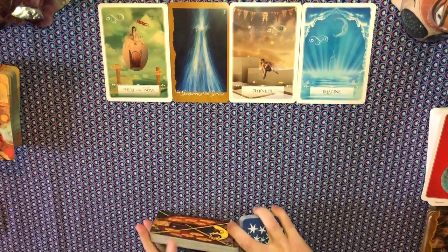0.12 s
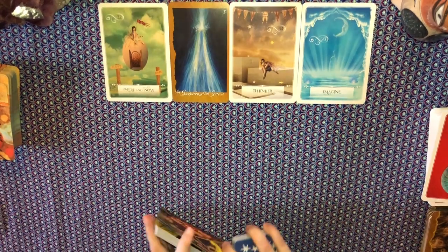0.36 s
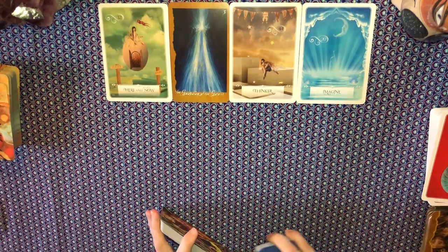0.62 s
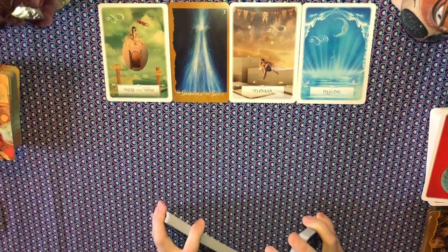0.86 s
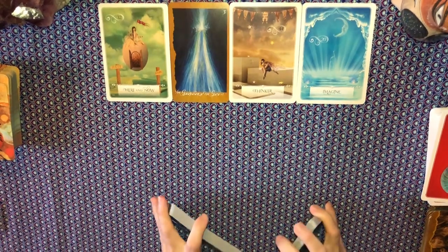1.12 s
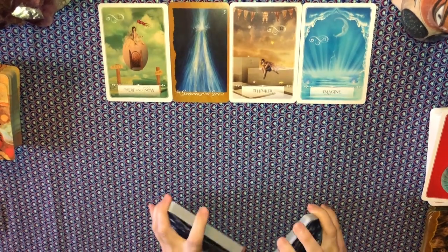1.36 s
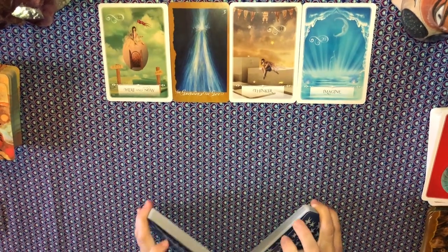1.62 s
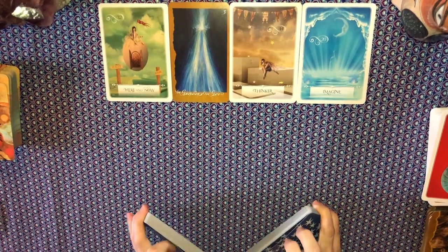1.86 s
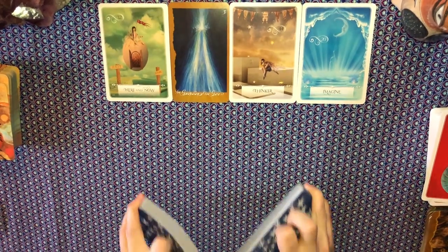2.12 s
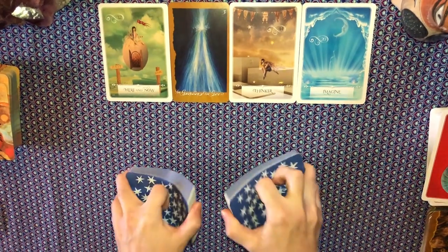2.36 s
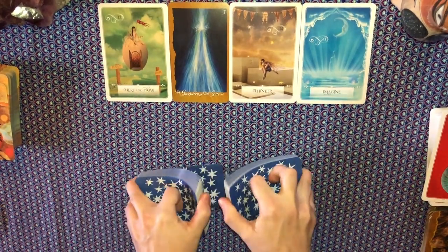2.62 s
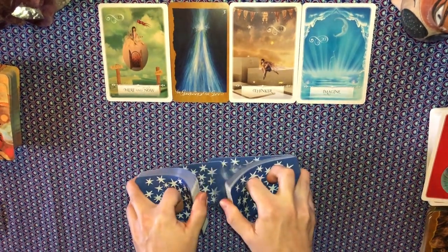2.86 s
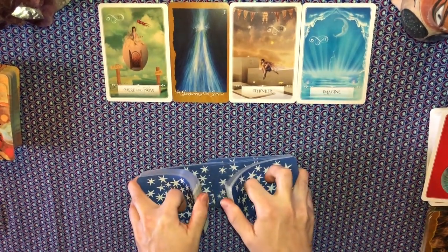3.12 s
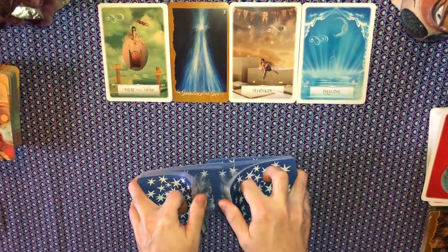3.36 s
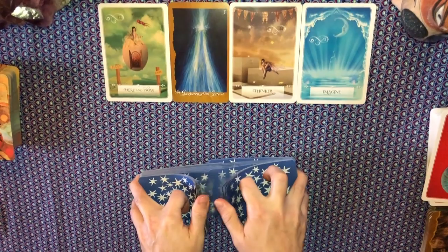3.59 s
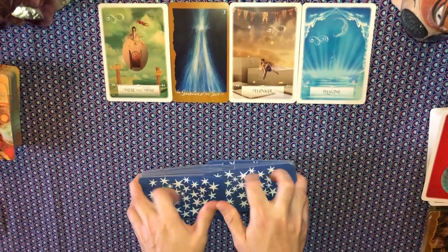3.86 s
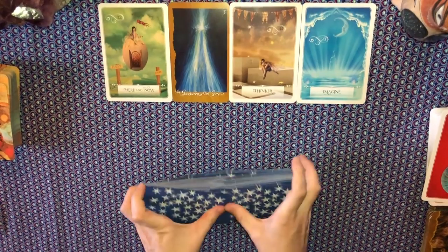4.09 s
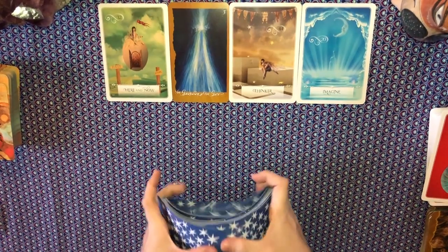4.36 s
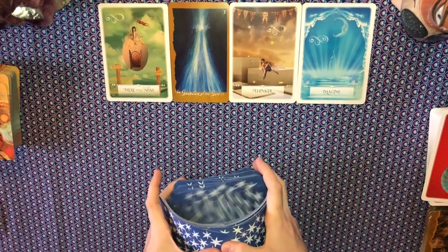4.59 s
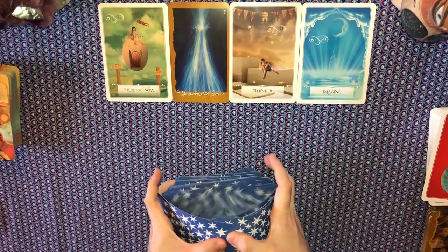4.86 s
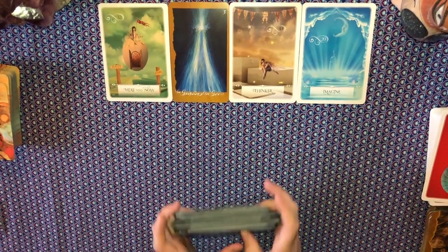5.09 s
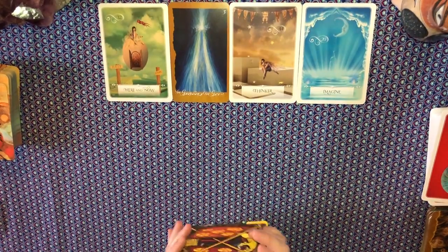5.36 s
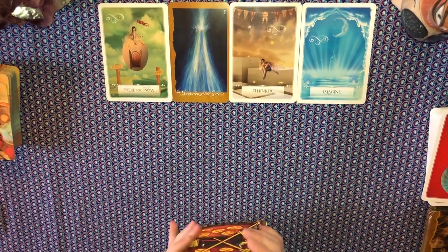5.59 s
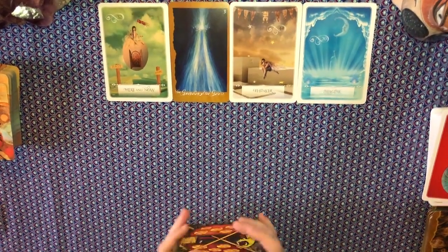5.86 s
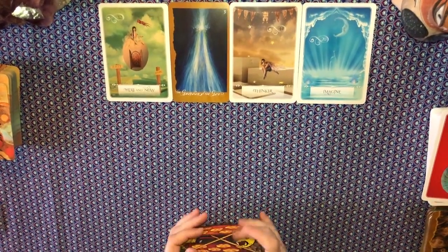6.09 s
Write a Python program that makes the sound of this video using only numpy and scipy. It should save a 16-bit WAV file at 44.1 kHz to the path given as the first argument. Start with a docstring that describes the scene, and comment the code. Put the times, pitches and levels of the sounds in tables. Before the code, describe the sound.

Close, dry recording of hands shuffling a stiff deck of cards on a cloth-covered table in a small quiet room. Faint handling rubs and dull taps lead to a crisp riffle that starts sparse and grows into a loud, dense crackle. After a short pause, the bridged cards cascade together in a softer hissing flutter, followed by a cluster of padded knocks and light rubs.

```python
"""A deck of large cards is riffled close by on a cloth-covered table: each card is four bursts of shaped noise.
As the deck bends to a bridge the cards slide down in a hissing cascade of clumped noise and tiny ticks.
Before and after come taps, noise pushes that ring the table's modes, and soft rubs of swelling noise.
Brief squeaks are wavering tones; a small quiet room adds scattered reflections, hiss and faint whines."""
import sys
import numpy as np
from scipy import signal
from scipy.fft import rfft, irfft
from scipy.io import wavfile
from scipy.ndimage import uniform_filter1d

SR = 44100
rng = np.random.default_rng(int(sys.argv[2]) if len(sys.argv) > 2 else 0)


def elevation(decibels):
    """Turn decibel levels (scalar or array-like) into linear amplitude ratios."""
    levels = np.asarray(decibels, float)
    return 10 ** (levels / 20)


def persist_wave(psi):
    """Save psi, clipped to +-1, as 16-bit WAV."""
    counts = np.round(np.clip(psi, -1, 1) * 32767).astype(np.int16)
    wavfile.write(sys.argv[1], SR, np.atleast_2d(counts).T)


N = 274298

# cards leaving the thumb: (time [s], mean of crack and clap level [dB], crack over clap [dB],
# landing level before weighting [dB], scrape [relative length])
CARD_SNAPS = [(2.5289, -61, 6, -44.5, 1.1), (2.642, -38, -5.5, -44.5, 3.7),
              (2.6464, -47.5, 19, -41.5, 0.45), (2.679, -35.0, -2.0, -32.5, 1.5),
              (2.7243, -38.0, 23, -36.5, 0.66), (2.7344, -33, -0.5, -33, 2.2),
              (2.7919, -29.5, -10.5, -31.5, 0.44), (2.8096, -15.5, -7, -19.5, 0.4),
              (2.8607, -44, -1, -46, 2.2), (2.8654, -36, 4, -34.5, 0.83), (2.898, -39, 7, -31.0, 0.19),
              (2.9083, -31, -7.0, -37, 0.4), (2.9261, -31.5, -7, -29.5, 0.58),
              (2.9447, -36, -4.5, -35, 1.1), (2.9842, -41.5, -4.5, -36.5, 0.41),
              (2.9968, -36.5, -8, -45, 0.36), (3.0444, -61, -2, -50, 0.46),
              (3.0835, -43.5, -3.5, -46.0, 1.2), (3.0963, -25, -7.5, -21, 0.37),
              (3.1089, -33.5, -3.5, -44, 0.2), (3.1781, -59, -11, -42, 2.7),
              (3.1977, -15.5, -1, -22.5, 0.62), (3.207, -20.0, -6.0, -18.5, 2.7),
              (3.2116, -21, 10.5, -28, 0.24), (3.2142, -14, -12.0, -47, 0.54),
              (3.2385, -28.5, 1.5, -38, 1.3), (3.2496, -28.5, 2, -34, 0.9), (3.2683, -27.5, 8, -30, 1.1),
              (3.2818, -23.0, 27.5, -28, 0.18), (3.3024, -28, -4.5, -24.5, 0.21), (3.311, -20, 1, -38, 0.5),
              (3.3232, -20.5, -0.5, -20.5, 0.7), (3.3318, -25, 11.5, -48, 0.9),
              (3.3483, -25.5, -15.5, -28, 1.1), (3.3594, -12, 3, -26.5, 0.16),
              (3.3757, -28.0, 7.5, -27.5, 0.9), (3.389, -16.5, 4, -28, 0.66), (3.4376, -16, 17.5, -25, 0.3),
              (3.4482, -35, 16, -26.5, 0.91), (3.474, -15.5, 0.5, -25, 0.39), (3.4776, -15, 8, -34, 1.8),
              (3.5405, -13.5, -0.5, -33.5, 0.91), (3.5828, -25.5, -11, -26, 0.8),
              (3.5916, -23, -6, -28, 1.1), (3.6029, -26, -0.5, -29, 1.7),
              (3.6156, -38.5, -18.5, -50.0, 3.4), (3.6226, -34.5, -17.0, -31.5, 3.1),
              (3.6276, -25.5, -8.5, -51, 1.4), (3.6331, -31.0, 24.5, -24, 1.7),
              (3.6525, -28, 1, -26.5, 1.9), (3.6679, -22.0, -2, -28.5, 0.9), (3.697, -39.5, 8, -52, 2.5),
              (3.7054, -10.5, 11.5, -44, 0.18), (4.3892, -27, 27.5, -40, 0.2),
              (4.412, -25, -1.5, -28.5, 1.1), (4.4161, -30.5, -13.5, -50, 0.5),
              (4.437, -28.0, -4.5, -35, 1.4), (4.482, -34.0, 8.5, -45, 1.5), (4.496, -21, -0.5, -31, 1.2),
              (4.5111, -32.0, -6, -37, 1.3), (4.5235, -29, -13.5, -60, 1.1), (4.5353, -24, -1, -30, 1.2),
              (4.5495, -33.5, -3, -46, 1.3), (4.571, -24, -8, -43.0, 0.9), (4.5758, -29.5, -10, -39, 2.1),
              (4.5932, -22.5, -2.5, -29, 0.62), (4.601, -25.5, -6.5, -48, 1.4),
              (4.6181, -28, 3.5, -30, 1.1), (4.622, -16.0, 4.5, -33.5, 0.074),
              (4.6432, -22.0, -7.0, -39, 1.5), (4.7273, -39, 3.5, -36.5, 1.6),
              (4.7483, -29.5, -0.5, -57, 2.8), (4.7725, -36.5, 1.5, -31, 2.1), (4.8334, -42, 11, -30, 0.43),
              (4.8455, -37, 2.5, -48, 1.7), (4.8577, -52.5, 1.5, -35, 2.5), (4.8695, -37.0, -2, -36, 0.5),
              (4.9105, -39.5, -19, -43, 1.3), (4.9228, -27.5, 8, -36, 1.5), (4.934, -44, -2, -38, 1.7),
              (4.9591, -39.5, -7.5, -36.5, 0.69), (4.9928, -33.5, 1, -29.5, 1.3),
              (5.0065, -29.5, -8.5, -38.0, 0.3)]
# the parts of a snap: (low edge [Hz], high edge [Hz], rise [s], fast decay t60 before any scrape stretch [s])
CRACK = (4830, 15540, 0.000045, 0.0013)
CLAP = (2350, 7070, 0.0001666, 0.0056)
BODY = (865, 3370, 0.0016, 0.0054)
FLAP = (111, 1500, 0.00084, .041)
# air wedges trapped by a few cards: (time [s], level [dB], mean pitch [Hz])
AIR_POCKETS = [(3.209, -18, 3600), (3.214, 1, 3280), (3.5405, -13.5, 3300), (3.6283, -10.5, 3500)]
# cards sliding over each other, one table a bout: (time [s], hiss level [dB])
SLIDE_BOUTS = [
    [(2.62, -68), (2.82, -70.5), (3.07, -75), (3.2, -66.5), (3.35, -46), (3.51, -55.5), (3.58, -53),
     (3.73, -57.5), (3.79, -80.5)],
    [(4.25, -74.5), (4.335, -49), (4.38, -38.5), (4.56, -49.5), (4.76, -43), (4.94, -39), (4.98, -57),
     (5.055, -57.5), (5.1, -75)],
]
# tone of the sliding hiss: (frequency [Hz], relative level [dB])
HISS_TONE = [(600, -27), (1500, -13), (2500, -3), (4500, 0.5), (9000, -3.5), (16600, -9.5), (17700, -14.5),
             (19500, -75.5)]
# tone of the whole pack's low rustle: (frequency [Hz], relative level [dB])
RUSTLE_TONE = [(60, -20), (130, -4.5), (400, 12.5), (1200, -7.5), (2500, -17.5), (5000, -46)]
# low rustle of the pack, one row a bout: (level against the hiss [dB], build-up time [s])
PACK_RUSTLE = [(2, 0.074), (-10, 0.18)]
# soft rubs of fingers and cards: (middle [s], level [dB], length, 1/1.6 of the whole swell [s],
# pitch that sets the band [Hz])
SOFT_RUBS = [(0.158, -71.5, 0.036, 7000), (0.363, -59.5, 0.045, 3850), (0.408, -65, 0.038, 4500),
             (1.234, -67, 0.052, 3250), (1.359, -72, 0.11, 4960), (1.477, -72, .12, 6000),
             (1.807, -68.5, 0.065, 3450), (1.913, -69, .08, 3430), (3.868, -58, .035, 8180),
             (4.105, -65, .1, 4700), (4.19, -63, 0.072, 6600), (5.167, -55, 0.077, 2700),
             (5.272, -62, .07, 8360), (5.517, -65.5, 0.06, 6900), (5.643, -69, .1, 4400),
             (5.699, -64, .03, 6400), (5.755, -56.5, 0.048, 6000), (6.027, -67.5, 0.026, 8000),
             (6.082, -68.5, 0.074, 4000)]
# faint ticks of card edges: (time [s], level [dB])
EDGE_TICKS = [(0.6687, -60), (1.739, -50.5), (2.5094, -54), (3.8949, -42.5), (5.3557, -56.5), (6.0807, -51)]
# fingers squeaking on the coating: (time [s], length [s], pitch reached [Hz], level [dB])
FINGER_SQUEAKS = [(1.798, .02, 2940, -66), (1.883, 0.038, 3140, -69), (4.067, .032, 1091, -50)]
# deck or knuckles on the cloth: (time [s], level [dB], favoured pitch [Hz], t60 of the settling push [s])
CLOTH_TAPS = [(0.348, -39.5, 155, 0.012), (0.669, -58.5, 300, 0.014), (0.978, -47.5, 326, 0.024),
              (1.036, -46.5, 336, 0.035), (1.101, -38, 310, 0.052), (1.591, -63, 1310, 0.023),
              (1.738, -58, 1520, 0.014), (1.878, -63.5, 1310, 0.017), (2.461, -53, 150, 0.0083),
              (5.203, -52, 204, 0.016), (5.253, -36.5, 248, 0.049), (5.253, -43, 1060, 0.049),
              (5.275, -39, 640, 0.082), (5.301, -36, 920, 0.033), (5.325, -47, 752, 0.03),
              (5.376, -51.5, 299, 0.0083), (6.09, -56, 201, .02)]
# modes of the table top under the cloth: (frequency [Hz], level before focus [dB], t60 [s])
TABLE_MODES = [(126, 0, .25), (150, -2, .14), (205, 0, .11), (245, -3, .07), (300, -1, .14), (380, -3, .06),
               (500, -2, .05), (650, -3, .04), (830, -3, .03), (1050, -1, .03), (1400, -3, .02),
               (2000, -4, .012)]
# reflections of the room: (frequency [Hz], t60 [s], relative level [dB])
ROOM_DECAY = [(120, 0.21, -1), (500.4, 0.27, 0), (2300, 0.22, 3.5), (6000, 0.17, 1), (15570, 0.32, -12)]
# tone of the room and microphone hiss: (frequency [Hz], relative level [dB])
AIR_TONE = [(15, -54.5), (25, -20), (65, 0), (227, -4), (292, -7.5), (396, -9.5), (431, -6), (482, -7.5),
            (819, -13), (891, -12), (1740, -14.5), (16700, -32), (19800, -51)]
# faint fuzzy tones: (frequency [Hz], level [dB], distance from centre to half amplitude [Hz])
FUZZY_WHINES = [(835, -83, 25), (4270, -92, 60)]


def snaps():
    """Every card gives a crack, a clap, a duller body and a slower flap that shakes the table."""
    body_db, flap_db = -0.4, -1.02  # against the landing level
    every_card = np.concatenate([CARD_SNAPS, loose_cards()])
    start, snap_db, edge_db, land_db, scrape = every_card.T[:, :, None]
    heavy_db = 0.29 * (land_db + 33.5)  # heavy landings give more body and less flap
    crack_level = snap_db + edge_db / 2
    clap_level = snap_db - edge_db / 2
    body_level = land_db + body_db + heavy_db
    flap_level = land_db + flap_db - heavy_db
    drag = 0.15 + 2.17 * scrape.clip(0)  # the longer the edge scrapes, the longer the bright parts last
    seed = rng.standard_normal((len(start), 2048))
    seed[:, 6:7] += 2.8 / drag ** 1.51 * np.sign(seed[:, 6:7])  # a clean release is one sharp spike
    t = np.arange(2048) / SR
    cards = 0
    # level, part, stretch of the decay, envelope smoothing [samples]
    for db, (low, high, rise, t60), stretch, size in (
            (crack_level, CRACK, drag, 40), (clap_level, CLAP, drag, 40),
            (body_level, BODY, np.sqrt(drag), 100), (flap_level, FLAP, 1, 200)):
        envelope = (1 - np.exp(-t / rise)) * shiver(t / (t60 * stretch))
        cards = cards + elevation(db) * peaked(band(seed * envelope, low, high), size)
    fade = np.cos(np.pi / 2 * t / t[-1])  # the tremble fades smoothly to silence by the end of each burst
    out, landing = np.zeros(N), np.zeros(N)
    for at, card, level in zip(start[:, 0], cards, flap_level):
        add(out, at, card * fade)
        add(landing, at + 0.0037, elevation(level))  # the table is struck 3.7 ms later
    shake = elevation(-11.5) * signal.fftconvolve(landing, table(150, focus_db=-7.5))[:N]
    return out, shake


def loose_cards():
    """Lesser cards drop at random wherever the pack is sliding, louder where it hisses more."""
    per_s, scrape = 50, 0.41
    rows = []
    for bout in SLIDE_BOUTS:
        s, hiss_db = np.transpose(bout)
        wait, size, edge, land = rng.random((200, 4)).T
        at = s[0] + np.cumsum(-np.log(1 - wait)) / per_s
        db = np.interp(at, s, hiss_db) - 2.5 - 4.5 * np.log(1 - size)  # a few stand out
        edge_db = 16 * (edge - .5)
        landing_db = db - 4.5 + 12 * (land - .5)
        cards = np.c_[at, db, edge_db, landing_db, np.full_like(at, scrape)]
        rows.append(cards[at < s[-1]])
    return np.concatenate(rows)


def shiver(u):
    """A fast decay, then the card trembles on faintly."""
    return elevation(-60 * u) + elevation(-30 - 10 * u)


def air_pockets():
    """A trapped wedge of air rings as a short tone of unsteady pitch."""
    t60, rise, waver = .012, .0003, .1  # s, s, rms share of the pitch
    t = np.arange(2048) / SR
    out = np.zeros(N)
    for at, db, hz in AIR_POCKETS:
        wander = evened(uniform_filter1d(rng.standard_normal(len(t)), 16))
        pitch = hz * (1 + waver * wander)
        envelope = elevation(db - 60 * t / t60) * (1 - np.exp(-t / rise))
        add(out, at, envelope * tone(pitch))
    return out


def slides():
    """Friction hiss with many tiny edge ticks, both in uneven clumps, over the pack's low rustle."""
    ticks_per_s = 800
    t, out = np.arange(N) / SR, np.zeros(N)
    noise, clump, low = rng.standard_normal((3, N))
    strength = elevation(4 * np.minimum(rng.exponential(1, N), 4))
    hits = (rng.random(N) < ticks_per_s / SR) * strength
    ticks = signal.oaconvolve(hits, burst(1, .0001, .0035, length=512)[0])[:N]
    signed_ticks = evened(ticks) * np.sign(uniform_filter1d(low, 9))  # polarity flips at random
    clumps = elevation(1.7 * evened(uniform_filter1d(clump, 400)))
    hiss = coloured(clumps * (noise + 1.5 * signed_ticks), HISS_TONE)
    rustle = coloured(low * clumps, RUSTLE_TONE)
    for rows, (pack_db, build) in zip(SLIDE_BOUTS, PACK_RUSTLE):
        s, hiss_db = np.transpose(rows)
        level = elevation(np.interp(t, s, hiss_db, -150, -150))
        swell = np.clip((t - s[0]) / build, 0, 1) ** 2
        out += level * (hiss + elevation(pack_db) * swell * rustle)
    return out


def taps():
    """A padded, crumbly blow: settling noise drives the table's modes and crunches by itself."""
    blow, contact_db = 45, -17.5  # first impulse; crack of the edge on the cloth
    out = np.zeros(N)
    for s, db, spot_hz, settle in CLOTH_TAPS:
        decays = np.array([[settle], [3.2 * settle], [.025]])
        push, crumbs, edge = burst(3, 0.0033, decays, length=8192)
        touch = signal.windows.hann(round(SR / (3 * spot_hz)) + 2)  # hard spots touch briefly
        push[:len(touch)] += blow * touch / len(touch)
        ring = signal.fftconvolve(push, table(spot_hz, focus_db=-13))[:len(push)]
        low, high = spot_hz / 1.7, 1.7 * spot_hz
        crunch = band(band(crumbs, low, high), low, high)  # twice for steeper skirts
        thud = peaked(peaked(ring, 400) + 0.45 * peaked(crunch, 400), 400)
        contact = elevation(contact_db) * peaked(band(edge, 790, 3100), 100)
        add(out, s, elevation(db) * (thud + contact))
    return out


def table(spot_hz, focus_db):
    """Decaying modes answer a knock, weakened by focus_db at an octave from spot_hz; peak 1."""
    hz, db, t60 = np.transpose(TABLE_MODES)[:, :, None]
    t = np.arange(12000) / SR
    near_db = focus_db * np.log2(hz / spot_hz) ** 2
    modes = elevation(db + near_db - 60 * t / t60) * np.sin(2 * np.pi * hz * t)
    ring = modes.sum(0)
    return ring / abs(ring).max()


def rubs():
    """Soft friction gives short swells of wide-band noise."""
    out = np.zeros(N)
    for s, db, length, hz in SOFT_RUBS:
        swell = signal.windows.hann(round(1.6 * length * SR))
        friction = evened(band(rng.standard_normal(len(swell)), hz / 3.5, hz * 2.2))
        add(out, s - .8 * length, elevation(db) * swell * friction)
    return out


def edge_ticks():
    """A single card edge gives a tiny burst of bright noise."""
    out = np.zeros(N)
    bursts = burst(len(EDGE_TICKS), rise=0.00065, t60=0.01)
    for (s, db), tick in zip(EDGE_TICKS, peaked(band(bursts, 2000, 12000), 20)):
        add(out, s, elevation(db) * tick)
    return out


def squeaks():
    """Short stick-slip tones rise to their pitch and waver, the low ones rougher."""
    rise_hz, rise_s = 200, .009
    out = np.zeros(N)
    for s, length, hz, db in FINGER_SQUEAKS:
        t = np.arange(0, length, 1 / SR)
        rise = np.minimum(t / rise_s, 1)
        wander = evened(uniform_filter1d(rng.standard_normal(4000), 40))[:len(t)]
        waver = 1 + .3 * (800 / hz) ** 1.4 * wander
        pitch = (hz - rise_hz * (1 - rise)) * waver
        swell = np.sin(np.pi * t / length) ** 0.3
        add(out, s, elevation(db) * swell * tone(pitch))
    return out


def room(x):
    """Three tails of sparse reflections, taking turns, each band dying at its own speed."""
    f, t60, colour_db = np.transpose(ROOM_DECAY)
    hits = np.zeros((3, SR // 2))
    slots = np.arange(60, SR // 2 - 20, 20)  # one reflection in every 20 samples
    at = slots + rng.integers(0, 20, (3, len(slots)))
    np.put_along_axis(hits, at, rng.choice([-1., 1.], at.shape), 1)
    hz, t, z = signal.stft(hits, SR, nperseg=128)
    band_db = read(np.c_[f, colour_db], hz)[:, None]
    band_t60 = read(np.c_[f, t60], hz)[:, None]
    tails = signal.istft(z * elevation(band_db - 60 * t / band_t60), SR, nperseg=128)[1]
    tails = tails / np.linalg.norm(tails[0])
    cycles = np.arange(N) / SR * 7 + np.arange(3)[:, None] / 3  # 7 Hz, a third of a cycle apart
    turn = np.cos(2 * np.pi * cycles) * np.sqrt(2 / 3)
    return signal.fftconvolve(x * turn, tails, axes=1)[:, :N].sum(0)


def air():
    """Steady hiss and rumble with a few fuzzy whines, each a narrow band of noise."""
    f = np.fft.rfftfreq(N, 1 / SR)
    out = elevation(-66) * coloured(rng.standard_normal(N), AIR_TONE)
    for hz, db, width in FUZZY_WHINES:
        spectrum = rfft(rng.standard_normal(N)) / (1 + ((f - hz) / width) ** 2)
        out += elevation(db) * evened(irfft(spectrum, N))
    return out


def evened(x):
    """Scales to rms 1."""
    return x / np.sqrt(np.mean(x ** 2) + 1e-20)


def peaked(rows, size):
    """Scales each row so that its envelope, smoothed over size samples, tops out at 1."""
    top = uniform_filter1d(2 * rows ** 2, size, -1, mode="constant").max(-1, keepdims=True)
    return rows / np.sqrt(top + 1e-20)


def read(points, hz):
    """Reads a curve on a log-frequency axis."""
    f, value = np.transpose(points)
    return np.interp(np.log(hz + 1), np.log(f + 1), value)


def add(mix, s, sound):
    """Mixes a sound in at a time in seconds."""
    part = mix[round(s * SR):][:len(sound)]
    part += sound[:len(part)]


def tone(pitch):
    """A sine that follows a pitch in Hz, sample by sample."""
    return np.sin(2 * np.pi * np.cumsum(pitch) / SR)


def coloured(x, spectrum):
    """Filters x by a spectrum and scales it to rms 1."""
    gain = elevation(read(spectrum, np.fft.rfftfreq(len(x), 1 / SR)))
    return evened(irfft(rfft(x) * gain, len(x)))


def band(x, low_hz, high_hz):
    """Causal band-pass."""
    edges = [low_hz, min(high_hz, .45 * SR)]
    return signal.sosfilt(signal.butter(2, edges, "band", fs=SR, output="sos"), x)


def burst(count, rise, t60, length=2048):
    """Rows of noise that rise and die away."""
    t = np.arange(length) / SR
    return rng.standard_normal((count, length)) * (1 - np.exp(-t / rise)) * elevation(-60 * t / t60)


def scene():
    """Hands and cards near, the table below, the room around them."""
    cards, shake = snaps()
    hands = cards + air_pockets() + slides() + taps() + rubs() + edge_ticks() + squeaks()
    near = hands + elevation(-16) * room(hands) + shake
    # cards and table give off little below 112 Hz
    radiated = signal.sosfilt(signal.butter(4, 112, "high", fs=SR, output="sos"), near)
    return (radiated + air())[None]


def top_cut(x):
    """Nothing passes above the cut-off."""
    return signal.sosfilt(signal.butter(12, 19900, fs=SR, output="sos"), x)


def record(dry):
    """The input stage rounds off the very loudest cracks."""
    knee = .95  # level it cannot pass
    mix = dry / (1 + (dry / knee) ** 4) ** (1 / 4)
    return top_cut(mix)


dry = scene()
out = record(dry)
persist_wave(out)
```